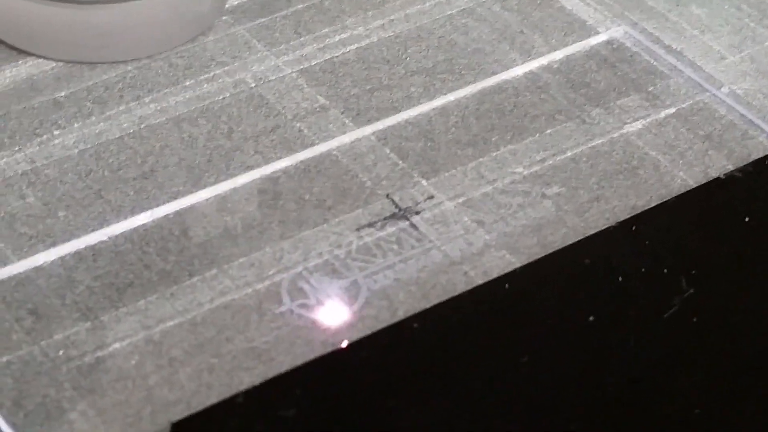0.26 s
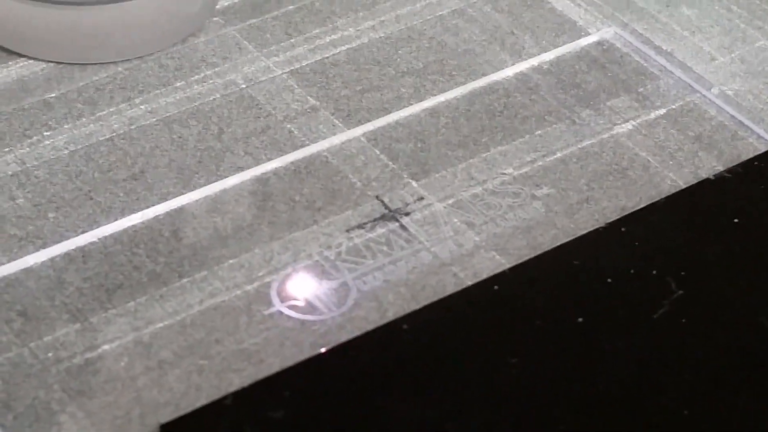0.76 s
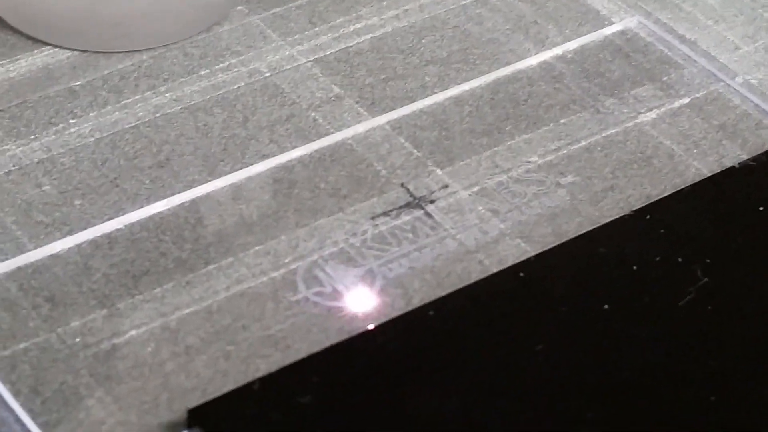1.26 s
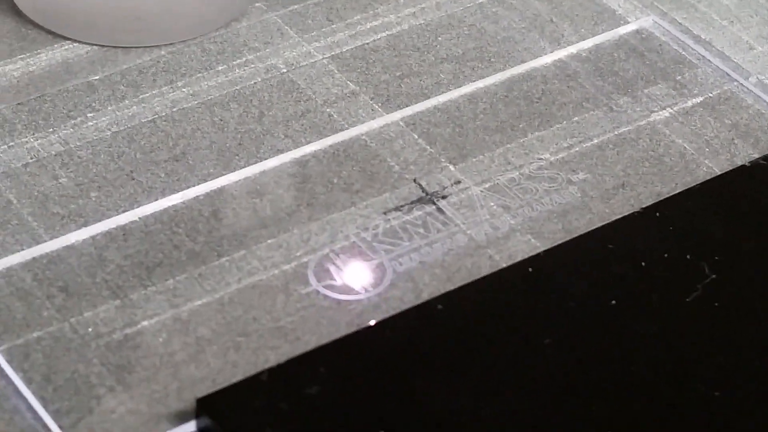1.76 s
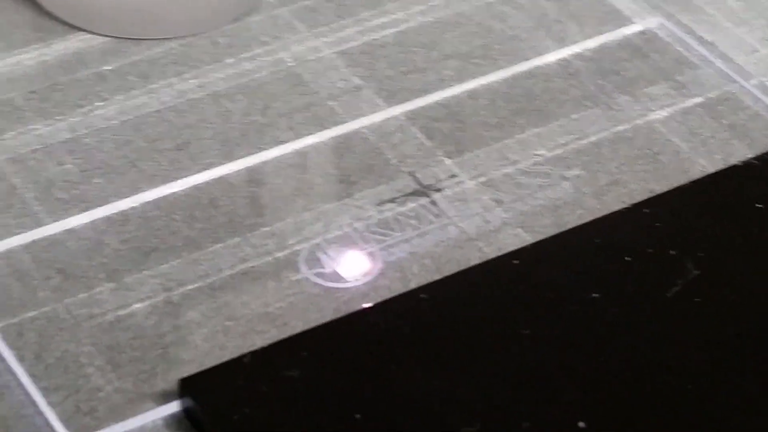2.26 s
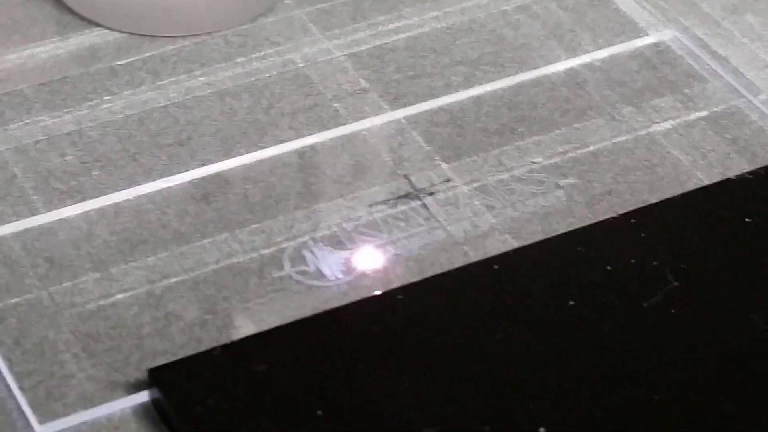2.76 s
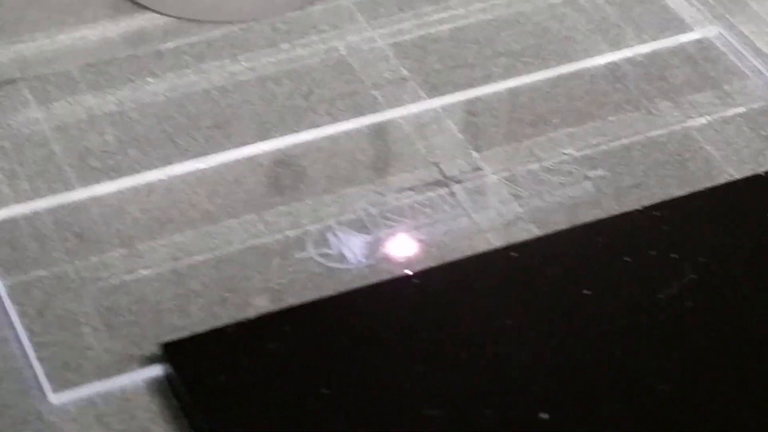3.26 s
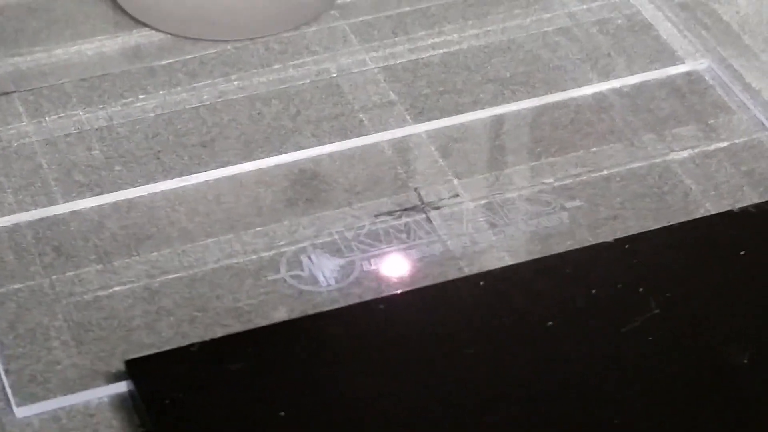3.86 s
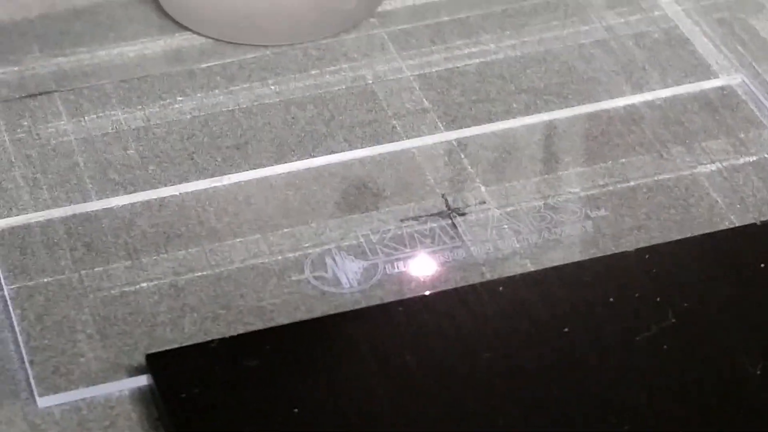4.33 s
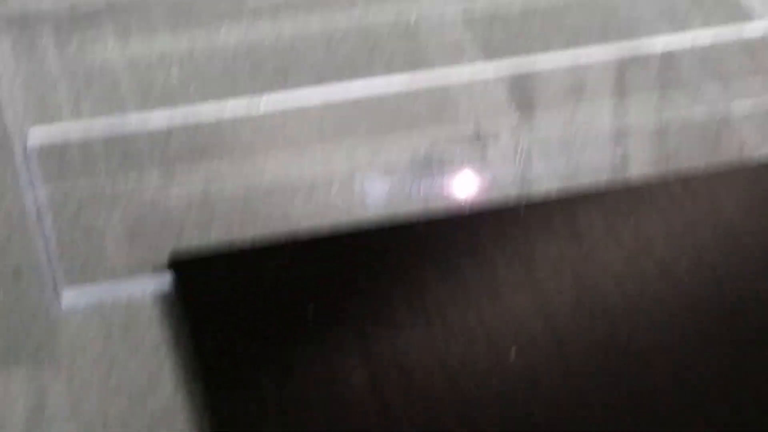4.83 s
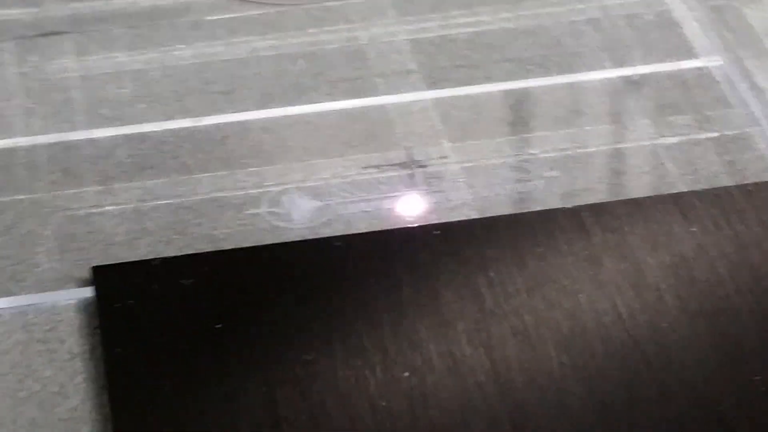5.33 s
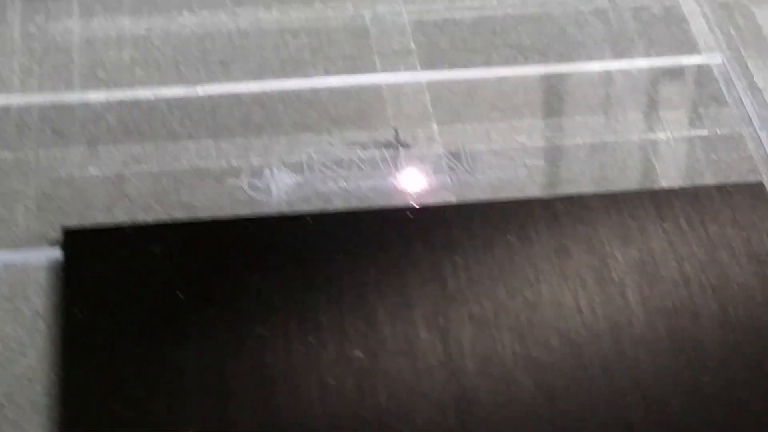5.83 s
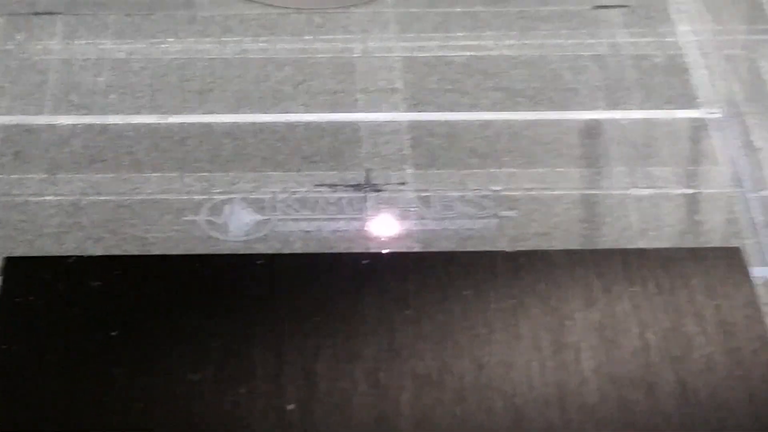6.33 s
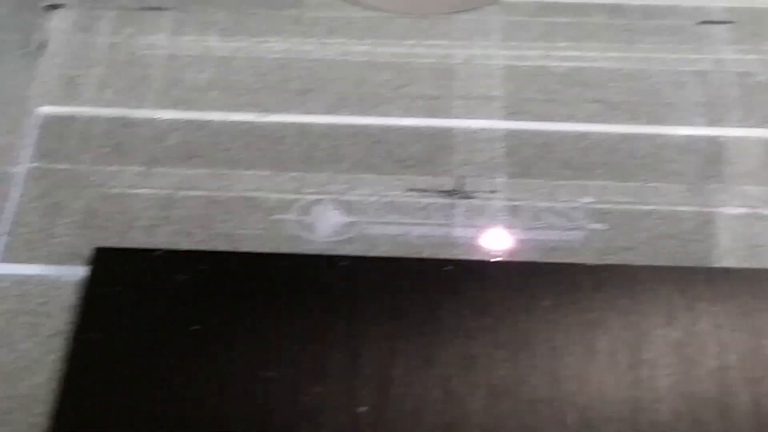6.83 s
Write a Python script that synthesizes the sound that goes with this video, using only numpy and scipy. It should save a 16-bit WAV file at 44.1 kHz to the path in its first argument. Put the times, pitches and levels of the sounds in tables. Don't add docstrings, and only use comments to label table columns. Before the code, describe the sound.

A close handheld stereo microphone turns around a pulsed laser whose sparks fuse into a fixed, extremely high pure tone. Its level ripples and dips briefly, moving from right toward left. Below lie low fan rumble, motor hum, moving air and soft hiss. A couple of isolated metallic clinks lead to a bright burst of jingling keys, then sparse faint ticks and one dull double tap on the left.

```python
import sys
import numpy as np
from scipy import signal
from scipy.fft import rfft, irfft, next_fast_len
from scipy.io import wavfile
from scipy.ndimage import map_coordinates

SR = 44100
rng = np.random.default_rng(int(sys.argv[2]) if len(sys.argv) > 2 else 0)


def unload_wav(signal):
    wavfile.write(
        sys.argv[1],
        SR,
        np.round(np.clip(np.atleast_2d(signal).T, -1, 1) * 32767).astype(np.int16),
    )


def gain_from_db(level_db):
    decades = np.asarray(level_db, float) / 20
    return 10 ** decades


N = 312664


def unit(x):
    return x / np.sqrt(np.mean(x ** 2) + 1e-20)


def along(points, hz):
    f, v = np.transpose(points)
    return np.interp(np.log(hz + 1), np.log(f + 1), v)


def curves(rows):
    s, *cols = np.transpose(rows)
    return [np.interp(np.arange(N) / SR, s, c) for c in cols]


def bumps(rows):
    t = np.arange(N) / SR
    return sum(np.outer(height, np.clip(1 - abs(t - s) / half_s, 0, 1))
               for s, half_s, *height in rows)


def wobble(rate_hz):
    knots = rng.standard_normal(int(N * rate_hz / SR) + 4)
    return map_coordinates(knots, [np.arange(N) * rate_hz / SR])


def filtered(x, response):
    m = next_fast_len(N + SR // 2)
    hz = np.fft.rfftfreq(m, 1 / SR)
    return irfft(rfft(x, m) * response(hz), m)[..., :N]


def add(track, s, sound):
    at = round(s * SR)
    track[:, at:at + sound.shape[1]] += sound[:, :N - at]


# t/s, left level/dB, right level/dB, extra path to right port/mm
AIM = [(0.0, -33.7, -23.6, 12.8), (1.543, -33.1, -23.8, 10.6), (2.362, -24.8, -26.2, 2.5),
       (2.87, -24.5, -22.7, -2.5), (3.119, -28.9, -22.9, -4.7), (3.734, -22.3, -20.8, -2.2),
       (3.832, -24.8, -22.6, -1.0), (4.294, -22.2, -22.3, 0.4), (4.532, -24.0, -27.6, -2.3),
       (5.292, -28.9, -31.3, -8.1), (5.484, -28.4, -32.8, -0.1), (5.695, -27.6, -25.8, -2.9),
       (6.04, -22.3, -26.8, -5.0), (6.206, -21.3, -29.5, -6.2), (6.278, -21.3, -32.0, 0.4),
       (6.443, -19.8, -27.0, -2.5), (6.766, -21.2, -28.6, -4.5), (7.09, -24.4, -22.9, -12.2)]
# leaves t/s, turns t/s
STROKES = [
    (0.013, 0.457),
    (0.939, 1.46),
    (1.832, 2.073),
    (2.341, 2.457),
    (2.606, 2.684),
]
# left level/dB, right level/dB, path/mm
PER_STROKE_S = [9.8, -5, -13.8]
# t/s, half length/s, level/dB
GAPS = [
    (.939, .033, -3.2),
    (1.803, .033, -3.2),
    (2.333, .014, -2.5),
    (2.601, .012, -2.5),
    (3.733, .016, -1.5),
    (3.795, .019, -2.7),
    (3.878, .062, -1.4),
    (4.243, .029, -1.2),
    (5.98, .038, -.8),
    (6.83, .039, -2.1),
]
# t/s, half length/s, left/dB, right/dB, path/mm
SWAYS = [
    (1.605, .252, .5, 1.9, -.5),
    (2.102, .193, -1.1, -1.7, 0),
    (4.842, .083, .2, 3.2, 0),
    (4.936, .102, -4.6, 4.1, 2.2),
    (5.035, .097, -4.6, 3.7, 1.2),
    (5.16, .134, -.9, -1.4, -2),
    (5.359, .085, 0, -2.6, 0),
    (5.622, .106, 2.7, .2, 1),
    (6.249, .102, .4, -5.8, 0),
]
SPARK_HZ = 10830.85
PARKED_S = 2.875


def laser():
    travel = []
    for leaves_s, turns_s in STROKES:
        travel += [(leaves_s, 0), (turns_s, turns_s - leaves_s)]
    travel_s, = curves(travel + [(PARKED_S, 0)])
    *port_db, path_mm = np.array(curves(AIM)) + np.outer(PER_STROKE_S, travel_s) + bumps(SWAYS)

    flicker_db = 0.27 * wobble(22) + 0.13 * np.clip(wobble(200), -2.5, 2) ** 3
    jitter_rad = 0.03 * wobble(900)
    tremor_db = 0.094 * np.array([wobble(36), wobble(36)])
    level_db = port_db + bumps(GAPS) + 8.0 + flicker_db + tremor_db

    lead_rad = np.pi * SPARK_HZ * path_mm / 343000
    phase_rad = 2 * np.pi * SPARK_HZ * np.arange(N) / SR + jitter_rad
    return gain_from_db(level_db) * np.sin(phase_rad + np.outer([1, -1], lead_rad))


def ringing(clusters, t, loudest_hz):
    hz, spread_hz, db = np.repeat(clusters, 3, axis=0).T[:, :, None]
    detune, size, start, lag = rng.standard_normal((4, len(hz), 1))
    gain = gain_from_db(db + 3 * size + 8 * np.exp(-((hz - loudest_hz) / 500) ** 2))
    phase = 2 * np.pi * (hz + spread_hz * detune) * t + 3 * start
    return unit(np.array([np.sum(gain * np.sin(phase + side * lag), 0) for side in (1, -1)]))


# t/s, peak level/dB, loudest f/Hz, big key level/dB, clatter share/0-1
CLINKS = [
    (2.086, -25, 11600, -15, 0.66),
    (3.261, -20, 11700, -8, 0.38),
    (3.4295, -23, 13500, -2, 0.9),
    (3.474, -16, 12000, -11, 0.26),
    (3.634, -21.5, 12000, -5, 0.35),
    (3.7873, -12, 11600, -14.5, 0),
    (3.81, -16, 11700, -23, 0),
    (3.8392, -17.5, 12800, -1, 0),
    (3.8756, -16, 13300, -4.5, 0),
    (3.9015, -13, 12000, -11, 0.03),
]
# f/Hz, spread/Hz, level/dB
SMALL_KEYS = [(10300, 60, -8), (11300, 80, -5), (11700, 110, 0), (12050, 60, -6), (12330, 70, -1),
              (13000, 70, -3), (13300, 70, -4), (13560, 90, -3), (14500, 60, -9), (14800, 60, -8),
              (15450, 110, -2)]
# f/Hz, spread/Hz, level/dB
BIG_KEY = [(9500, 50, 0), (6280, 70, -14), (7470, 25, -20), (5720, 40, -23), (8050, 60, -25)]
# f/Hz, spread/Hz, level/dB
KEY_RING = [(3550, 120, -4), (4600, 150, -3), (5700, 80, -2), (6300, 120, 0), (7200, 150, -5),
            (8100, 120, -7)]


def keys():
    out, t = np.zeros((2, N)), np.arange(SR // 3) / SR
    t60_s = .15
    bright = signal.butter(4, [9100, 15700], "bandpass", fs=SR, output="sos")
    dull = signal.butter(2, [3300, 8000], "bandpass", fs=SR, output="sos")
    for s, db, loudest_hz, big_db, share in CLINKS:
        clatter = unit(signal.sosfilt(bright, rng.standard_normal((2, len(t)))))
        scrape = .8 * unit(signal.sosfilt(dull, rng.standard_normal((2, len(t)))))

        fade = gain_from_db(-60 * t / t60_s) + 1.6 * gain_from_db(-60 * t / 0.039)
        fade = fade * (1 - np.exp(-t / 0.00034))
        small = fade * ((1 - share) * ringing(SMALL_KEYS, t, loudest_hz) + share * clatter)

        big_fade = gain_from_db(big_db - 60 * t / (1.6 * t60_s)) * (1 - np.exp(-t / .002))
        big = big_fade * ringing(BIG_KEY, t, 0)

        ring_db = -32 + 16 * min(share / .4, 1)
        ring = (1 - share) * ringing(KEY_RING, t, 0) + scrape
        ring = gain_from_db(ring_db - 60 * t / 0.34) * ring

        echo = gain_from_db(-22.0 - 60 * t / 0.86) * clatter
        add(out, s - .001, gain_from_db(db - 10.5) * (small + big + ring + echo))
    return out


# t/s, peak level/dB, f/Hz
TICKS = [
    (2.8669, -37, 12300),
    (4.145, -37, 12200),
    (4.2472, -34, 12100),
    (4.5251, -33, 13100),
    (4.814, -26, 13200),
    (5.6062, -35, 13600),
    (5.8955, -31, 14300),
    (6.548, -29, 11550),
    (6.7040, -30, 11550),
    (6.8588, -29, 11550),
]


def ticks():
    out, t = np.zeros((2, N)), np.arange(400) / SR
    for s, db, hz in TICKS:
        edge = .12 * np.diff(rng.standard_normal((2, 403)), 3)
        snap = np.sin(2 * np.pi * hz * t) + edge
        add(out, s, gain_from_db(db - 1 - 60 * t / .007) * snap)
    return out


# t/s, level/dB, f/Hz
TAPS = [
    (6.8244, -3, 740),
    (6.8293, -5, 880),
]


def taps():
    out, t = np.zeros((2, N)), np.arange(SR // 4) / SR
    for s, db, hz in TAPS:
        push = np.sin(2 * np.pi * hz * t) * gain_from_db(-60 * t / .004) * (1 - np.exp(-t / .00022)) ** 2
        thud = 0.14 * np.sin(2 * np.pi * 190 * t) * gain_from_db(-60 * t / 0.04)
        port_db = np.array([[0], [-17]])
        add(out, s, gain_from_db(db + 6 + port_db) * (push + thud))
    return out


def resonances(modes):
    def response(f):
        total = 0
        for k, (hz, width_hz, db) in enumerate(modes):
            damping = 1j * f * width_hz
            total = total + (-1) ** k * gain_from_db(db) * damping / (hz * hz - f * f + damping)
        return total
    return response


# t/s, level/dB, t60/s
RUSTLES = [
    (3.781, -25, 0.02),
    (3.785, -28, 0.31),
    (3.808, -48, 0.12),
    (3.845, -38.5, 0.45),
]
# f/Hz, width/Hz, level/dB
POCKET = [(770, 90, -2), (1180, 120, -3), (1700, 200, -2), (1900, 240, 1)]


def rustle():
    rub, t = np.zeros((2, N)), np.arange(SR // 4) / SR
    for s, db, t60_s in RUSTLES:
        crackle = rng.standard_normal((2, len(t))) ** 3 / 5
        add(rub, s, gain_from_db(db + 17 - 60 * t / t60_s) * crackle)
    return filtered(rub, resonances(POCKET))


# f/Hz, correlation/-1..1
ALIKE = [(40, .78), (100, .9), (300, .85), (700, .4), (1400, -.1), (3000, .1), (6000, 0), (12000, .05)]
# f/Hz, left minus right level/dB
LEAN = [(60, -0.5), (110, -3.5), (200, -1), (380, 0), (700, -1.0), (1290, -0.5), (2380, -1), (4400, -8.5),
        (8120, 0), (15000, 2)]


def rush(points):
    points = [(10, -120)] + points + [(22000, -120)]

    def mid_side(hz):
        angle = np.arccos(np.clip(along(ALIKE, hz), -1, 1)) / 2
        return gain_from_db(along(points, hz)) * [np.cos(angle), np.sin(angle)]

    mid, side = filtered(rng.standard_normal((2, N)), mid_side)
    pair = np.array([mid + side, mid - side])
    return unit(filtered(pair, lambda hz: gain_from_db(np.outer([.5, -.5], along(LEAN, hz)))))


# f/Hz, density/dB per Hz
RUMBLE = [(12, -53), (20, -29), (59, -4), (118, -3.5), (151, -5.5), (263, -9), (303, -17), (332, -15),
          (370, -17), (445, -16.5), (625, -23.5), (686, -22.5), (800, -31.5), (1040, -52), (1760, -120)]
# f/Hz, density/dB per Hz
AIR = [(350, -22), (600, -10.5), (682, -2), (940, -7.5), (1020, -6), (1230, -10), (1800, -10), (2080, -12),
       (3300, -34), (4290, -55), (7260, -120)]
# f/Hz, density/dB per Hz
HISS = [(1650, 3), (2800, 0), (3050, -5.5), (4000, -5), (4610, 1), (7580, -8.5), (8600, -7.5), (11200, -32),
        (18900, -120)]
# f/Hz, density/dB per Hz
FIZZ = [(8400, -38), (9000, -14), (9600, -1), (10300, -3), (11600, 0), (12600, -5), (13500, -1),
        (15100, -6), (15300, -15), (16200, -22)]


def airflow(open_db, rumble_db):
    rumble_db = rumble_db + 0.48 * wobble(3.1) + 0.78 * wobble(12)
    air_db = -44 + 0.59 * open_db + 0.52 * wobble(5)
    hiss_db = -55.5 + open_db
    drift_db = 0.47 * (np.arange(N) - N / 2) / SR
    fizz_db = -46.5 + .61 * open_db + drift_db + 0.66 * wobble(11)
    noise = gain_from_db(rumble_db) * rush(RUMBLE) + gain_from_db(air_db) * rush(AIR)
    return noise + gain_from_db(hiss_db) * rush(HISS) + gain_from_db(fizz_db) * rush(FIZZ)


# f/Hz, level/dB, width/Hz
MOTORS = [(120, -37, 2), (264, -45, 4), (360, -52, 2), (376.5, -48, 1), (404, -54, 3), (475, -56, 3),
          (577, -57, 2), (885, -60.5, .7), (1012, -58.5, .5), (1351, -68, 2), (1770, -66.5, 1),
          (2024, -67, 1.5)]
# t/s, level/dB
PUMP = [
    (0, -58.5),
    (2, -58),
    (3.65, -52),
    (5.05, -49.5),
    (5.92, -61.5),
    (7.09, -57),
]


def motors(rumble_db):
    out, t = np.zeros((2, N)), np.arange(N) / SR
    pump_db, = curves(PUMP)
    for hz, db, width_hz in MOTORS:
        drift = np.cumsum(width_hz * wobble(12)) / SR
        swell_db = rumble_db if hz < 800 else pump_db
        apart_rad = min(hz / 1500, .7) * np.array([wobble(1), wobble(1)])
        level_db = db + 3.5 + swell_db - swell_db.mean() + 1.1 * wobble(4.035)
        out += gain_from_db(level_db) * np.sin(2 * np.pi * (hz * t + drift) + apart_rad)
    return out


# t/s, level/dB
ROOM = [(0, -8), (.4, -6.5), (.99, -9.5), (1.46, -5), (1.87, -7), (2.74, -2), (3.28, -2), (3.49, 2),
        (3.79, 2.5), (4.25, 4), (4.62, 1), (4.93, 2), (5.27, 0), (5.88, 1), (6.28, 6), (6.77, 1), (7.09, 2)]


def equipment():
    open_db, = curves(ROOM)
    rumble_db = -30.5 + .55 * open_db
    return airflow(open_db, rumble_db) + motors(rumble_db)


def scene():
    return laser() + keys() + ticks() + taps() + rustle() + equipment()


def top_cut(x):
    return signal.sosfilt(signal.butter(12, 16120, fs=SR, output="sos"), x)


def record(dry):
    top_hz = 15830
    mix = filtered(dry, lambda hz: hz < top_hz)
    return top_cut(mix)


dry = scene()
out = record(dry)
unload_wav(out)
```